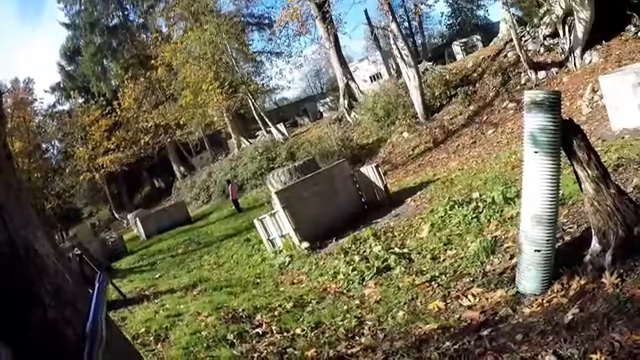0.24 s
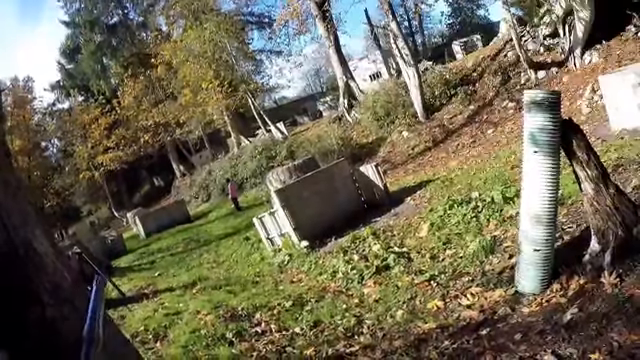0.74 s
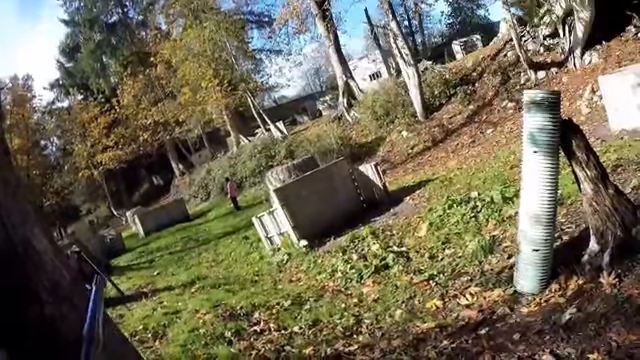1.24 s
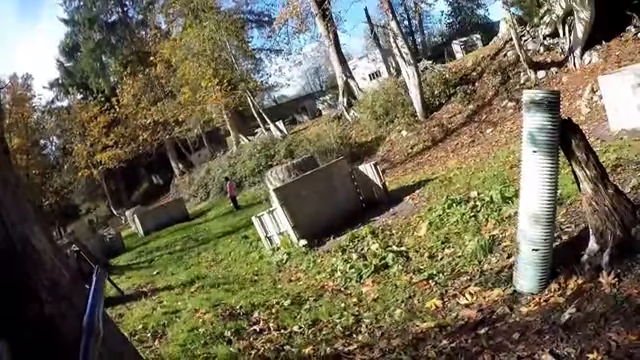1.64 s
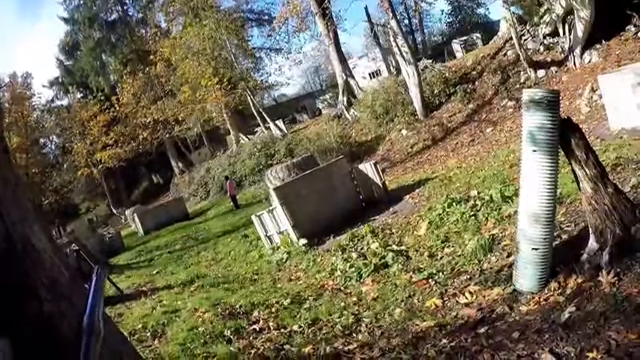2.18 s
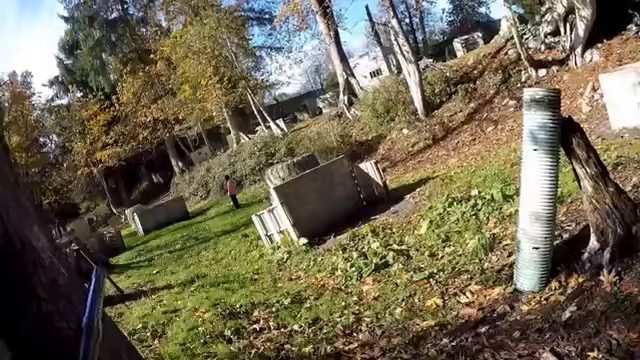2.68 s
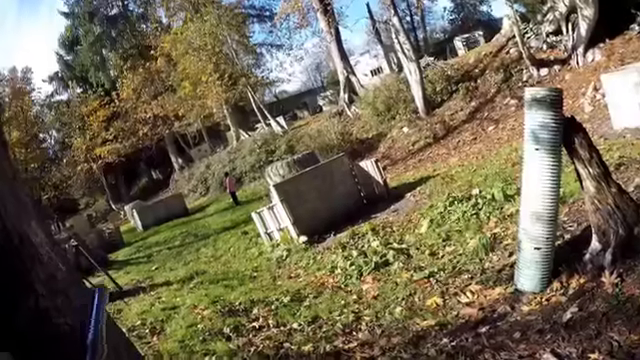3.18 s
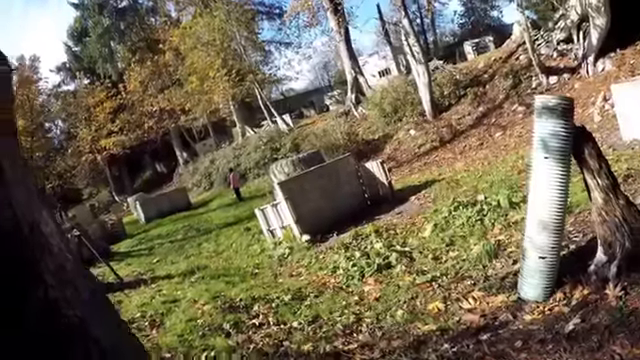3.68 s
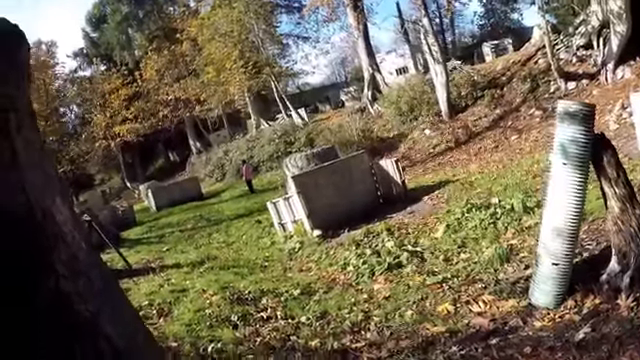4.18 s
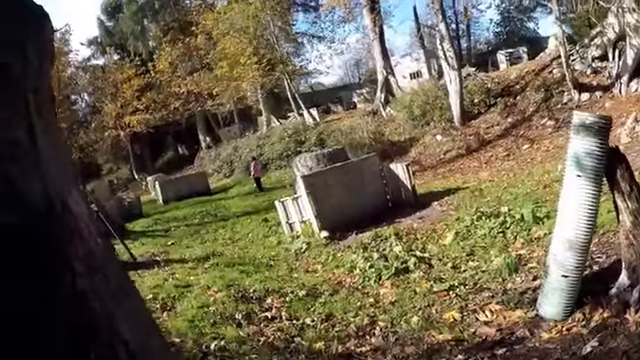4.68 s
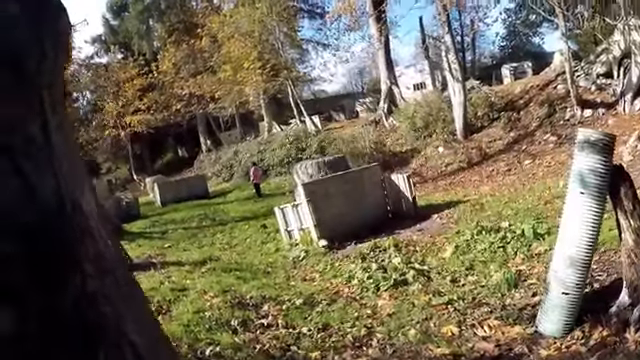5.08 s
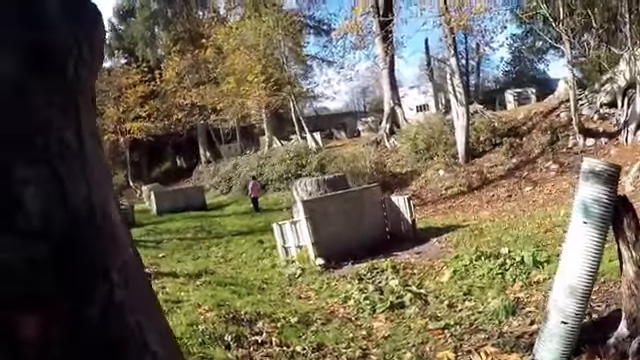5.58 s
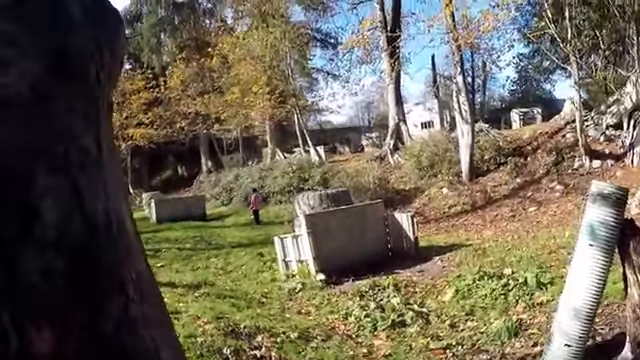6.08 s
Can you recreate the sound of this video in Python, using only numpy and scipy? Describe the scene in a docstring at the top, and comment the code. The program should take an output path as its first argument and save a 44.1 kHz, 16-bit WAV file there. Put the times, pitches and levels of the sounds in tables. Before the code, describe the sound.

Six close paintball shots snap and echo briefly among trees, followed by faint far-off splats, knocks and light wind on the microphone.

```python
"""Paintball shots in the woods

A paintball marker (a gas-powered gun) fires six shots close by, in a clearing among trees.
Each shot is the click of an electric valve, a pop of gas that rings the barrel and a bright
spit of exhaust; the woods scatter it back. The hopper (the ball tank) stirs its balls, paint
lands and other markers pop far away, and a light wind rumbles on the microphone."""
import sys
import numpy as np
from scipy import signal
from scipy.fft import rfft, irfft, next_fast_len
from scipy.io import wavfile

SR = 44100
rng = np.random.default_rng(int(sys.argv[2]) if len(sys.argv) > 2 else 0)


def store_pcm(level_fs):
    """Save levels as 16-bit WAV."""
    pcm = np.round(np.clip(level_fs, -1, 1) * 32767).astype(np.int16)
    wavfile.write(sys.argv[1], SR, np.atleast_2d(pcm).T)


N = 279153
TIME = np.arange(N) / SR
BRIEF = TIME[:SR // 4]   # a quarter second, for short sounds

# The shots. Ring, bark and bite turn the pop up or down near 1850, 1050 and 3400 Hz.
# start_s, level_db, click_lead_s, ring_db, bark_db, bite_db, exhaust_db
SHOTS = [(0.1467, 0, 0.022, -0.5, 0.5, 2.5, -1.5), (1.734, -0.56, 0.023, -0.5, 0, 1, -0.2),
         (1.8650, -0.5, 0.02, 3.5, -1.5, 1, -0.5), (2.5434, -0.5, 0.022, -2, 0, 0.5, 0.5),
         (2.739, 0.5, 0.021, -14.5, 9, 2, 0.5), (2.8445, -.5, 0.02, 3.5, -1, -5, 0)]
# Tone of escaping gas: pitch_hz, level_db
GAS_TONE = [(160, -14), (350, -3), (700, -9), (1300, -7), (1900, 1), (3000, -4.5), (3600, 0), (4400, -2.5),
            (7200, -3), (8500, -8.5), (10500, -6), (14500, -10.5)]


def from_db(db):
    """Turn decibels into a volume factor."""
    return 10 ** (np.asarray(db) / 20)


def rms_one(x):
    """Scale a sound to an average strength (rms) of 1."""
    return x / np.sqrt(np.mean(x ** 2) + 1e-20)


def add(track, start_s, sound):
    """Mix a sound into a track at the given time."""
    at = max(0, round(start_s * SR))
    track[at:at + len(sound)] += sound[:N - at]


def noise(tone):
    """Steady noise of strength 1, shaped by rows of pitch_hz, level_db."""
    hz, db = np.transpose(tone)
    size = next_fast_len(N)
    bins_hz = np.maximum(np.fft.rfftfreq(size, 1 / SR), 1)
    gain = from_db(np.interp(np.log(bins_hz), np.log(hz), db))
    return rms_one(irfft(rfft(rng.standard_normal(size)) * gain)[:N])


def drift(per_s):
    """A random curve that glides to a new value, typically within 1 of zero, per_s times a second."""
    return np.interp(TIME * per_s, np.arange(N // 8), rng.standard_normal(N // 8))


def bursts(rows, rise_s, fade_s):
    """Volume curve from rows of start_s, level_db, hold_s. A burst dies by 60 dB in fade_s."""
    power = np.zeros(N)
    for s, db, hold_s in rows:
        t = TIME[:SR] - min(s, 0)
        swell = 1 - np.exp(-t / rise_s)
        fade = from_db(db - 60 * np.maximum(t - hold_s, 0) / fade_s)
        add(power, s, (swell * fade) ** 2)
    return np.sqrt(power)


def ring(tones, scatter_db, detune):
    """Tones that swell and die, a little different each time. Wider tones die sooner."""
    hz, width_hz, db = np.transpose(tones)[:, :, None]
    chance = rng.standard_normal((len(tones), 2, 1))
    age = np.pi * width_hz * BRIEF
    sign = (-1) ** np.arange(len(tones))[:, None]
    wave = np.sin(2 * np.pi * hz * (1 + detune * chance[:, 0]) * BRIEF)
    volume = from_db(db + scatter_db * chance[:, 1]) * age * np.exp(1 - age)
    return np.sum(sign * volume * wave, axis=0)


def near(hz, centre_hz, octaves):
    """A weight that is 1 at the centre pitch and falls away on both sides."""
    return np.exp(-(np.log2(hz / centre_hz) / octaves) ** 2)


def pops():
    """Gas rushes down the barrel; the sliding bolt slams back and leaves the marker ringing."""
    # The barrel's tones as the gas pops: pitch_hz, width_hz, level_db
    barrel_tones = [(80, 45, -29.5), (195, 44, -45), (412, 180, -20), (680, 330, -34), (1065, 290, -27.5),
                    (1473, 439, -21.5), (1887, 290, -11), (2426, 250, -14), (3340, 380, -14),
                    (3946, 240, -25.5), (5740, 220, -26), (7010, 390, -33)]
    # The bolt's slam: pitch_hz, width_hz, level_db
    bolt_tones = [(325, 160, -32), (2600, 620, -15), (3660, 270, -21.5), (5740, 290, -19), (6220, 460, -22),
                  (6900, 490, -18.5), (7280, 430, -18), (9400, 460, -22.5), (11300, 520, -25),
                  (12670, 530, -28), (13920, 540, -27)]
    # The marker's ringing body: pitch_hz, level_db, fade_s
    body_tones = [(316, -43, .10), (385, -34.5, .08), (949, -50, 0.2), (1838, -34, 0.092), (3537, -43, .09),
                  (3758, -52, 0.12), (7267, -48, .12), (9868, -54, .1), (10600, -53, .12)]
    out = np.zeros(N)
    for s, db, _, ring_db, bark_db, bite_db, exhaust_db in SHOTS:
        def shot_db(hz):
            return (db + ring_db * near(hz, 1850, .22) + bark_db * near(hz, 1050, .55)
                    + bite_db * near(hz, 3400, .25))
        barrel = [(hz, width, level + shot_db(hz)) for hz, width, level in barrel_tones]
        body = sum(from_db(level + shot_db(hz) - 60 * BRIEF / fade_s) * np.sin(2 * np.pi * hz * BRIEF)
                   for hz, level, fade_s in body_tones)
        add(out, s, ring(barrel, scatter_db=.5, detune=.004))
        add(out, s + .0043, from_db(exhaust_db) * ring(bolt_tones, scatter_db=.1, detune=.01))
        add(out, s + .0061, body)
    return out


def exhaust():
    """Gas leaks and churns with the pop, spits out as the bolt returns, then hisses away."""
    # Tone of the bright spit: pitch_hz, level_db
    spit_tone = [(300, -6), (700, -18), (1300, -16), (1800, -4), (3000, -7.5), (3750, -3), (4500, -12),
                 (5300, -10.5), (5750, 3.5), (6200, -8.5), (7000, 3.5), (8000, -19.5), (9500, -10.5),
                 (14500, -22.5)]
    # Tone of gas churning at the barrel's mouth: pitch_hz, level_db
    churn_tone = [(150, -16), (350, -1), (550, 0), (900, -8), (1400, -1.5), (3200, -2.5), (5000, -14),
                  (12000, -25.5)]
    # The crack is the valve starting to open.
    crack = bursts([(s - .002, db - 41.5, .002) for s, db, *_ in SHOTS], rise_s=.001, fade_s=.005)
    leak = bursts([(s + .00045, db - 21, .005) for s, db, *_ in SHOTS], rise_s=.002, fade_s=.014)
    churn = bursts([(s + .0011, db - 29 + bark_db, .003) for s, db, _, _, bark_db, *_ in SHOTS],
                   rise_s=.000586, fade_s=.022)
    spit = bursts([(s + .0044, exhaust_db - 17.5, .0022) for s, *_, exhaust_db in SHOTS],
                  rise_s=.0003, fade_s=.007)
    hiss = bursts([(s + .0058, db - 34.5, .011) for s, db, *_ in SHOTS], rise_s=.0008, fade_s=.075)
    escaping = np.hypot(leak, hiss) + crack
    return spit * noise(spit_tone) + escaping * noise(GAS_TONE) + churn * noise(churn_tone)


def valve_clicks():
    """A small electric valve clicks and puffs about 20 ms ahead of each shot."""
    # The valve's click: pitch_hz, width_hz, level_db
    click_tones = [(171, 120, -51.5), (729, 400, -39.5), (1005, 280, -34), (1507, 260, -40),
                   (1880, 190, -36.5), (2700, 300, -48.5), (3450, 230, -38.5), (7000, 260, -42)]
    starts = [s - lead_s for s, _, lead_s, *_ in SHOTS]
    out = np.zeros(N)
    for s in starts:
        add(out, s, ring(click_tones, scatter_db=2.5, detune=.006))
    puff = bursts([(s + .0005, -33, .003) for s in starts], rise_s=.0012, fade_s=.016)
    seep = bursts([(s, -47, .01) for s in starts], rise_s=.002, fade_s=.051)
    return out + np.hypot(puff, seep) * noise(GAS_TONE)


def woods(shots):
    """Nearby trunks send back dull copies of each shot; the other trees scatter it in uneven clumps."""
    # Echoes off the nearest trunks: delay_s, level_db
    trunks = [(0.0103, -26.5), (.0215, -33), (.044, -37.5), (.0552, -33), (.064, -39), (0.08, -41.5)]
    # Tone of the scattered echo: pitch_hz, level_db
    tail_tone = [(150, -8), (400, -3.5), (650, -7), (980, 2.5), (1220, -8.5), (1800, 3), (2800, -4),
                 (3650, 3), (4400, -10), (7300, -13.5), (9000, -14.5), (10500, -13), (12000, -19.5),
                 (15000, -17.5)]
    dull = signal.sosfilt(signal.butter(1, [500, 4000], "band", fs=SR, output="sos"), shots)
    out = np.zeros(N)
    for delay_s, db in trunks:
        add(out, delay_s, from_db(db) * dull)
    tail = bursts([(s + .018, db - 47.5, .03) for s, db, *_ in SHOTS], rise_s=.006, fade_s=.48)
    return out + tail * noise(tail_tone) * from_db(1.8 * drift(per_s=130))


def rattle():
    """The kick of each shot shakes the balls in the hopper: four light ticks at random."""
    # A ball ticking on the hopper's shell: pitch_hz, width_hz, level_db
    tick_tones = [(1000, 150, -6), (1850, 170, -2), (2400, 250, -6), (3670, 220, 0), (7400, 400, -8),
                  (10500, 400, -9)]
    out = np.zeros(N)
    for s, db, *_ in SHOTS:
        for delay_s in rng.uniform(.02, .11, size=4):
            tick = ring(tick_tones, scatter_db=2.5, detune=.02)
            add(out, s + delay_s, from_db(db - 44.5 - 90 * delay_s) * tick)
    return out


def hopper():
    """The hopper's feeder stirs the balls in short runs of even strokes and coasts to a stop."""
    # Runs of the feeder: start_s, level_db, stroke_count
    runs = [(-.03, -53, 1), (1.945, -55.5, 4), (2.965, -54.5, 2), (3.235, -56, 3), (4.053, -55, 1),
            (4.15, -52.5, 2), (5.68, -55.4, 5)]
    # Tone of the stirred balls: pitch_hz, level_db
    stir_tone = [(170, -11), (280, 4), (450, -8.5), (1250, -11.5), (1750, -0.5), (2400, 1.5), (2900, -1.5),
                 (3750, 3), (4400, -11), (7200, -12), (9400, -20.5), (10400, -10.5), (11600, -20.5),
                 (14500, -19.5)]
    every_s, hold_s = .092, .052
    strokes = [(s + k * every_s, db, hold_s) for s, db, count in runs for k in range(count)]
    push = from_db(-1.83) * bursts(strokes, rise_s=.0016, fade_s=.16)
    coast = from_db(-2) * bursts(strokes, rise_s=.04, fade_s=.66)
    return np.hypot(push, coast) * noise(stir_tone) * from_db(1.3 * drift(per_s=250))


def far_splats():
    """Far paintballs clip twigs and burst, each quick touch weaker; the trees add a wash of echo."""
    # The splats: start_s, first_touch_db, touch_count
    splats = [(0.423, -50.5, 2), (0.865, -58, 1), (.934, -51, 2), (1.350, -51.5, 2), (3.886, -53.5, 1),
              (4.667, -56.5, 1), (4.925, -38.5, 5)]
    # A ball's smack: pitch_hz, width_hz, level_db
    smack_tones = [(418, 180, -20), (1620, 570, -9.5), (2390, 500, -4.5), (3650, 540, -0.5),
                   (5430, 1400, -6.5), (7700, 1200, -9)]
    # Tone of the spray and its echo: pitch_hz, level_db
    spray_tone = [(300, -11.5), (1100, -12.5), (1700, -2.5), (2350, 1.5), (2900, -7), (3700, 5.5),
                  (4500, -11.5), (8000, -13), (10000, -23.5), (15000, -24)]
    every_s, loss_db = .0064, .85
    touches = [(s + k * every_s, db - k * loss_db) for s, db, count in splats for k in range(count)]
    out = np.zeros(N)
    for s, db in touches:
        add(out, s, from_db(db) * ring(smack_tones, scatter_db=2, detune=.018))
    spray = bursts([(s, db - 8, .002) for s, db in touches], rise_s=.00033, fade_s=.031)
    wash = bursts([(s, db - 18, .01) for s, db in touches], rise_s=.01, fade_s=.5)
    return out + np.hypot(spray, wash) * noise(spray_tone)


def volley_knocks():
    """Knocks in far volleys vary in timing, strength and pitch. Gives start_s, level_db, pitch_hz."""
    # Volleys of faint knocks: start_s, length_s, level_db
    volleys = [(1.89, 0.092, -50), (2.94, .11, -41.5), (3.661, .62, -53.5), (4.46, 0.45, -55.5)]
    knocks_per_s, centre_hz, spread_octaves = 11, 1060, .13
    rows = []
    for start_s, length_s, db in volleys:
        count = int(np.ceil(length_s * knocks_per_s))
        for k, (late, extra_db, pitch) in enumerate(rng.standard_normal((count, 3))):
            s = start_s + length_s * (k + .2 * late) / count
            rows.append((s, db + extra_db, centre_hz * 2 ** (spread_octaves * pitch)))
    return rows


def far_knocks():
    """Paint hitting boards and other markers firing make dull knocks that echo in the trees."""
    # The clearest knocks: start_s, level_db, pitch_hz
    clear_knocks = [(1.796, -43.5, 990), (1.948, -43, 2330), (2.885, -36.5, 1580), (2.929, -37.5, 1060),
                    (2.971, -38, 2170), (3.716, -50.5, 2230), (3.886, -46.5, 1445), (4.062, -47, 1110),
                    (4.582, -52.5, 1300), (5.531, -50.5, 1103)]
    # Tone of their echo: pitch_hz, level_db
    wash_tone = [(200, -13.5), (600, -8), (1000, 2.5), (1250, -9.5), (1700, -2.5), (2400, -8),
                 (4000, -21.5), (12000, -41.5)]
    knocks = clear_knocks + volley_knocks()
    out = np.zeros(N)
    for s, db, hz in knocks:
        tones = [(.6 * hz, 400, db - 11.5), (hz, 230, db - 3.8), (1.5 * hz, 380, db - 9.5)]
        add(out, s, ring(tones, scatter_db=1, detune=.024))
    wash = bursts([(s, db - 13.5, .012) for s, db, _ in knocks], rise_s=.005, fade_s=.31)
    return out + wash * noise(wash_tone)


def rumble():
    """Gusts blow on the microphone, and the kick of each shot shakes the camera mount."""
    # Strength of the low rumble, from wind and the shots' shake: time_s, level_db
    rumble_levels = [(0.0, -46), (0.14, -45.5), (0.28, -51.5), (1.23, -54), (1.9, -49), (2.27, -54.5),
                     (2.5, -53.5), (2.77, -44.5), (3.03, -52.5), (3.67, -48.5), (4.65, -53.5), (5.52, -54),
                     (5.9, -49.5), (6.33, -57.5)]
    # Tone of the rumble: pitch_hz, level_db
    rumble_tone = [(12, -6), (28, 3.5), (45, -3), (70, -9), (100, -19.5), (150, -28), (300, -42),
                   (1000, -65)]
    rumble_db = np.interp(TIME, *np.transpose(rumble_levels)) + 2.5
    swells = from_db(rumble_db + drift(per_s=7.6))
    shake = bursts([(s, db - 45, .12) for s, db, *_ in SHOTS], rise_s=.01, fade_s=.5)
    return np.hypot(swells, shake) * noise(rumble_tone)


def mount_bumps():
    """When bumped, the camera mount sways at its own low pitch, with a faint tone an octave up."""
    # The bumps: peak_s, level_db, pitch_hz, rise_s, fall_s
    bumps = [(.715, -38.5, 62, 0.021, 0.021), (1.47, -45, 60, .05, .05), (3.915, -38, 40, 0.022, 0.02),
             (5.128, -41.5, 55, 0.034, 0.011), (5.959, -33, 68, 0.066, 0.021),
             (6.228, -36, 63, 0.016, 0.02)]
    out = np.zeros(N)
    for peak_s, db, hz, rise_s, fall_s in bumps:
        t = TIME - peak_s
        phase = 2 * np.pi * hz * t
        swell = np.exp(-(t / np.where(t < 0, rise_s, fall_s)) ** 2)
        out += from_db(db) * swell * (np.sin(phase) + from_db(-20) * np.sin(2 * phase))
    return out


def background():
    """Calm air hisses in the leaves and the camera whines faintly."""
    # Tone of the air: pitch_hz, level_db
    air_tone = [(88, -24), (150, -3), (221, -6), (404, -7.5), (509, -8.5), (1060, -10), (1510, -10),
                (1870, -7), (2230, -9.5), (3410, -10), (3910, -14), (4750, -13.5), (5540, -17),
                (14100, -24.5), (15500, -31)]
    # The camera's whine: pitch_hz, width_hz, level_db
    whine_tones = [(4770, 170, -75.5), (8629, 12, -84.5), (3500, 160, -83), (14400, 600, -86)]
    out = from_db(-63.5) * noise(air_tone)
    for hz, width_hz, db in whine_tones:
        phase = 2 * np.pi * hz * TIME
        out += from_db(db) * rms_one(drift(width_hz) * np.sin(phase) + drift(width_hz) * np.cos(phase))
    return out


def scene():
    """Mix the shots, their echoes and everything around them into one channel."""
    shots = valve_clicks() + pops() + exhaust()
    game = shots + woods(shots) + rattle() + hopper() + far_splats() + far_knocks()
    return (game + rumble() + mount_bumps() + background())[None]


def record(dry):
    """Round off the loudest peaks and cut the highest treble."""
    ceiling, cutoff_hz = 1.4, 16300
    rounded = ceiling * np.tanh(dry / ceiling)
    return signal.sosfilt(signal.cheby2(14, 70, cutoff_hz, fs=SR, output="sos"), rounded)


dry = scene()
out = record(dry)
store_pcm(out)
```